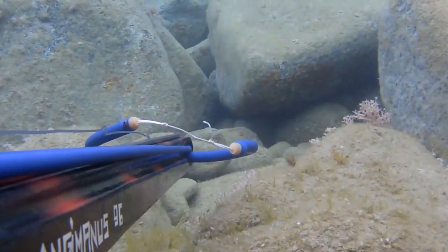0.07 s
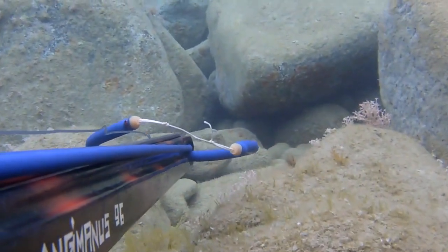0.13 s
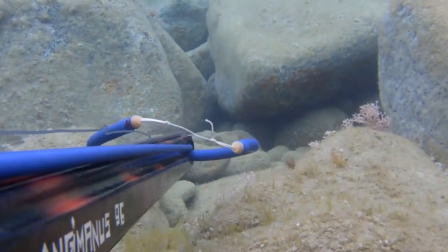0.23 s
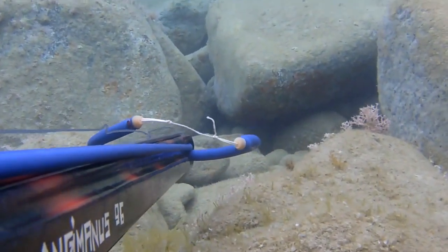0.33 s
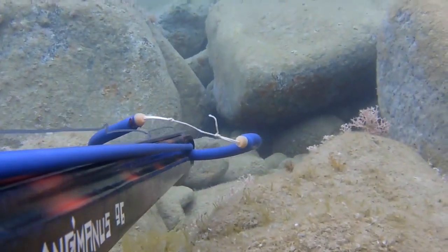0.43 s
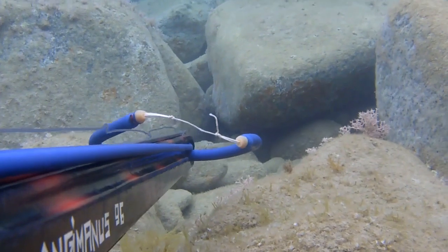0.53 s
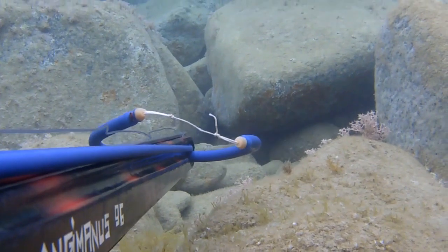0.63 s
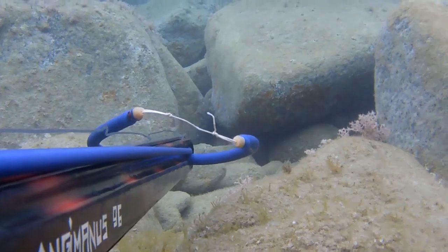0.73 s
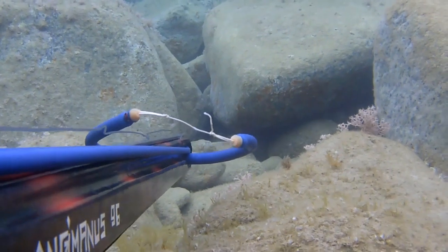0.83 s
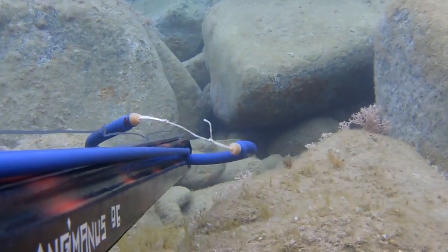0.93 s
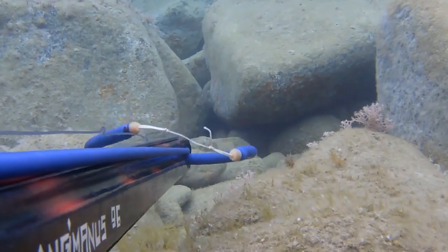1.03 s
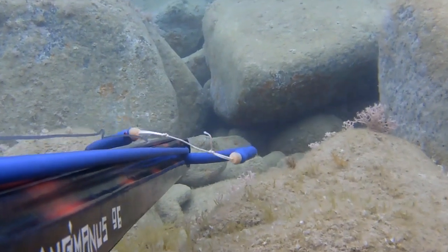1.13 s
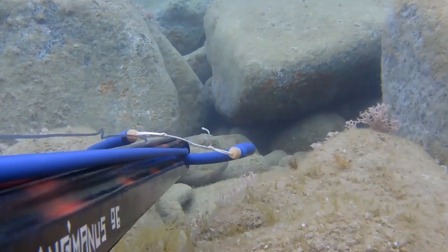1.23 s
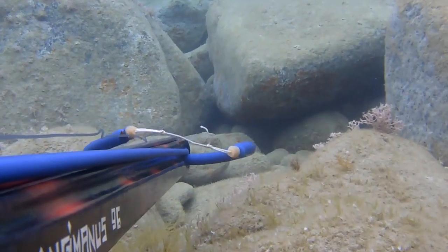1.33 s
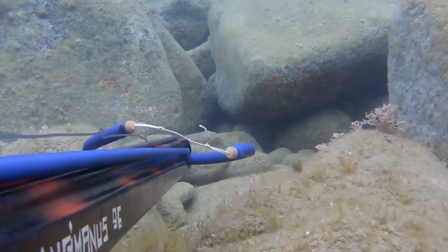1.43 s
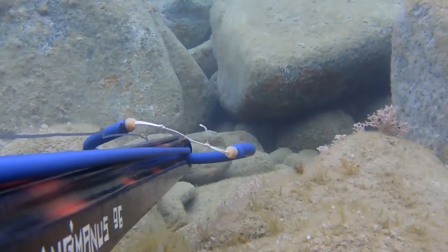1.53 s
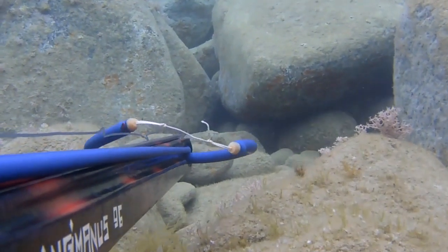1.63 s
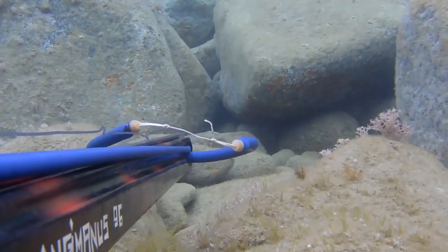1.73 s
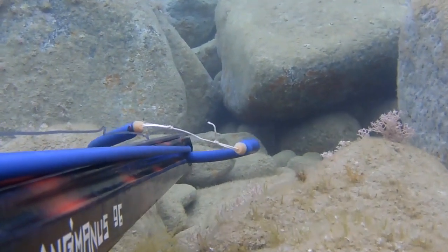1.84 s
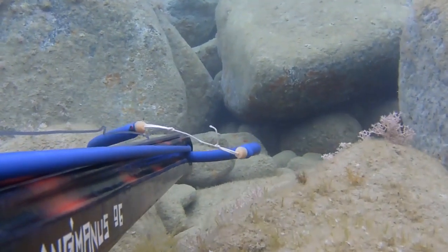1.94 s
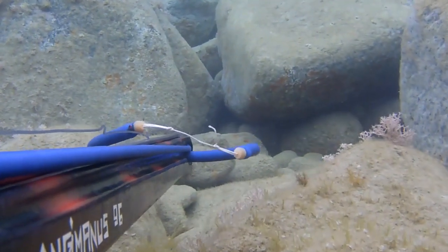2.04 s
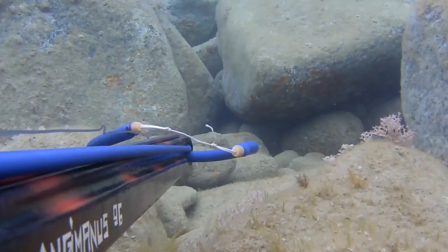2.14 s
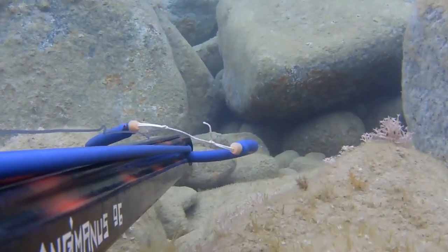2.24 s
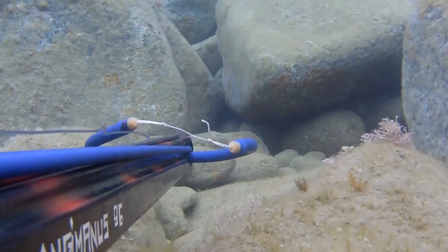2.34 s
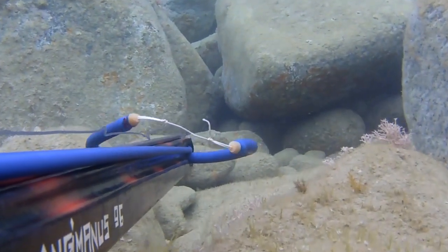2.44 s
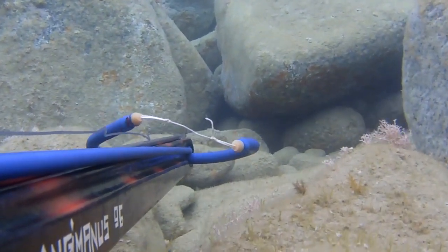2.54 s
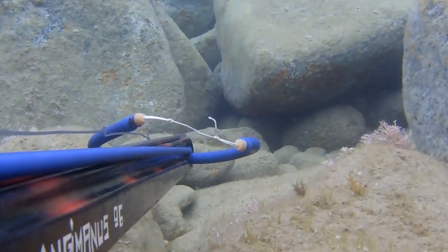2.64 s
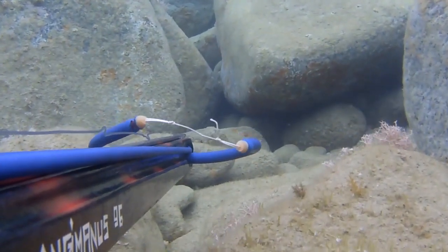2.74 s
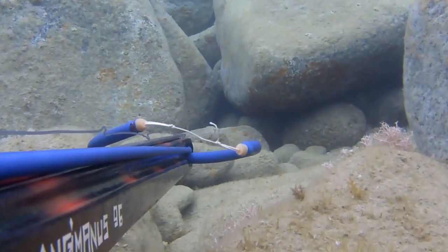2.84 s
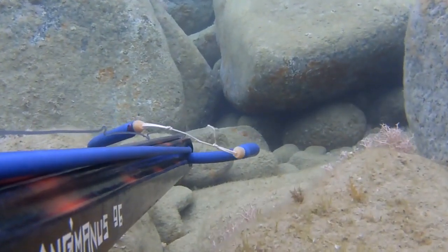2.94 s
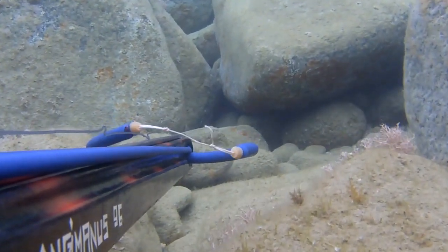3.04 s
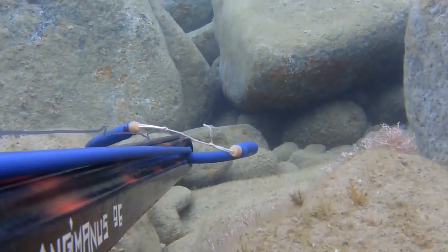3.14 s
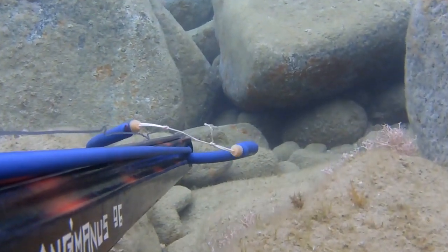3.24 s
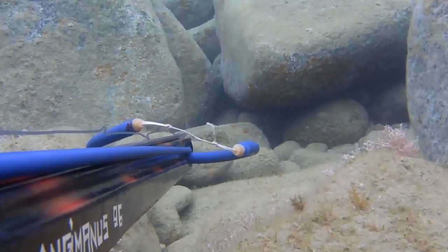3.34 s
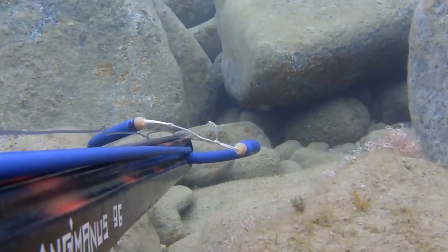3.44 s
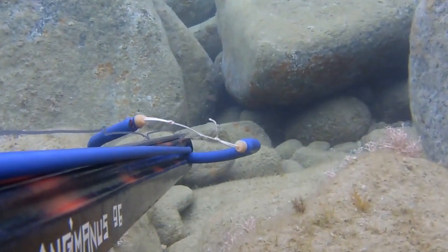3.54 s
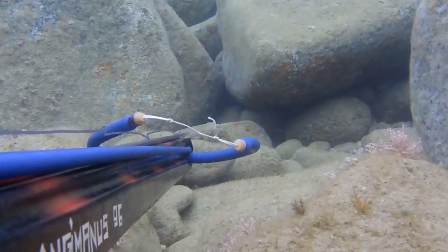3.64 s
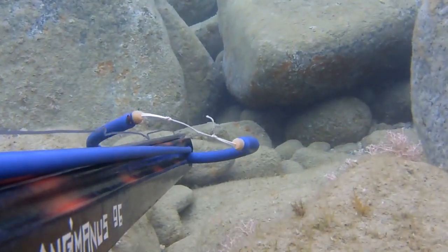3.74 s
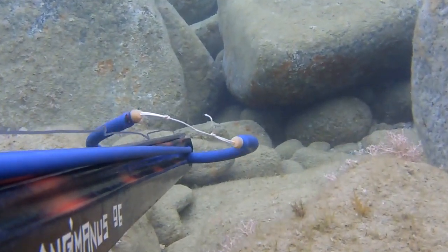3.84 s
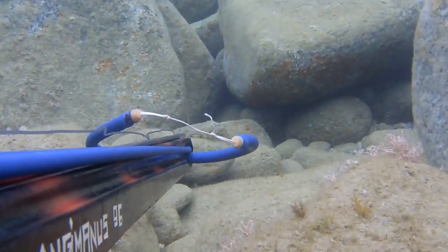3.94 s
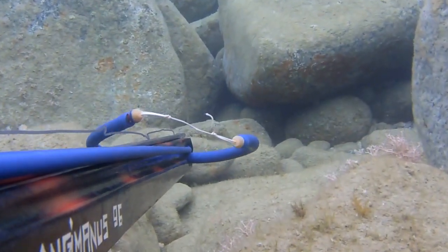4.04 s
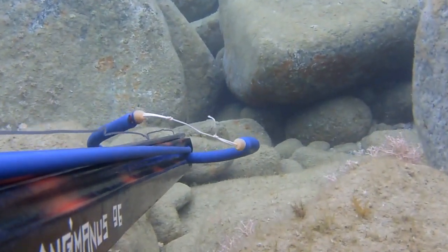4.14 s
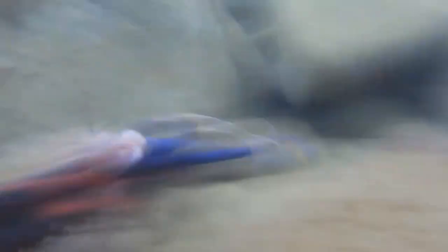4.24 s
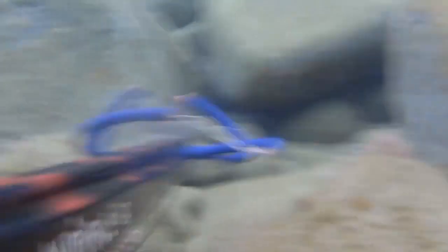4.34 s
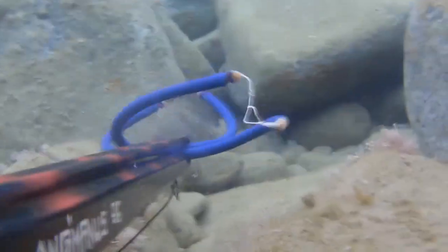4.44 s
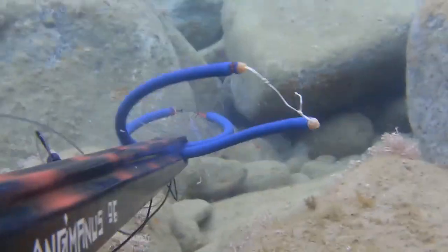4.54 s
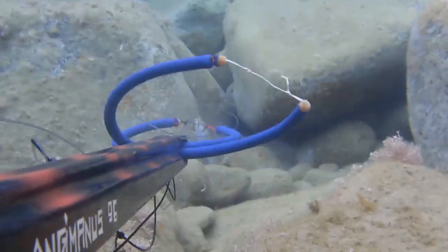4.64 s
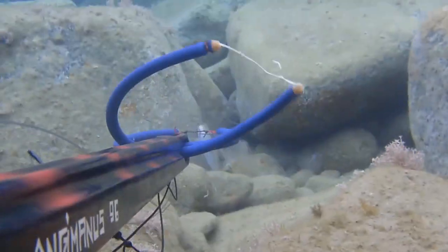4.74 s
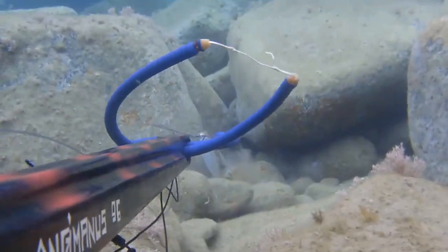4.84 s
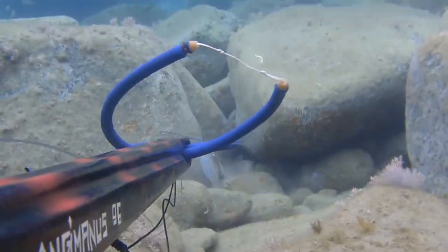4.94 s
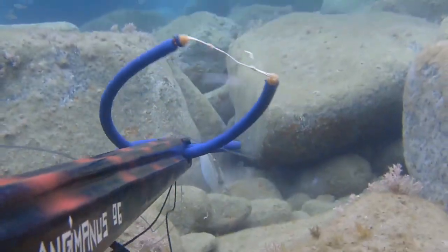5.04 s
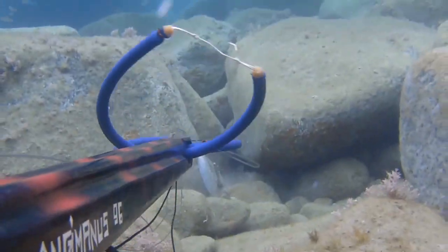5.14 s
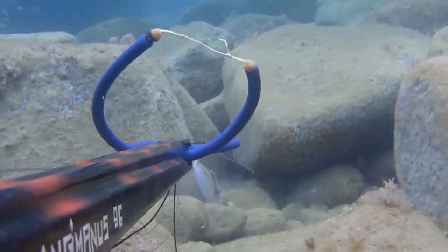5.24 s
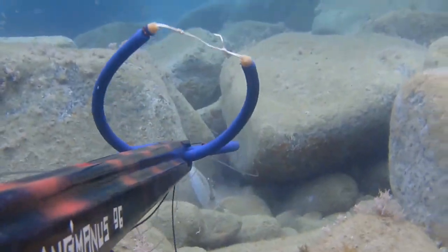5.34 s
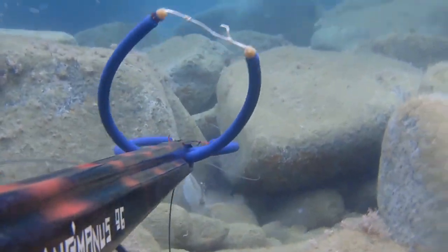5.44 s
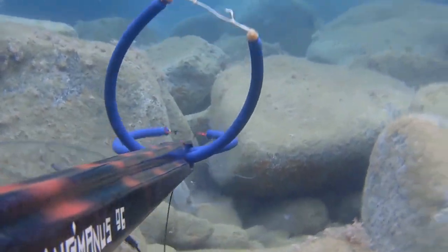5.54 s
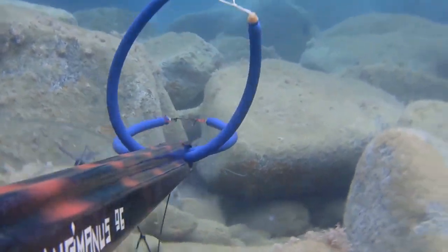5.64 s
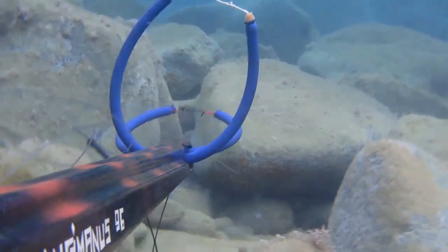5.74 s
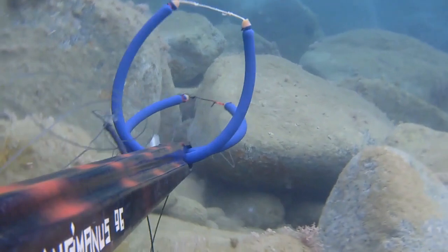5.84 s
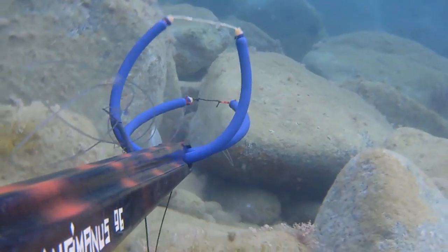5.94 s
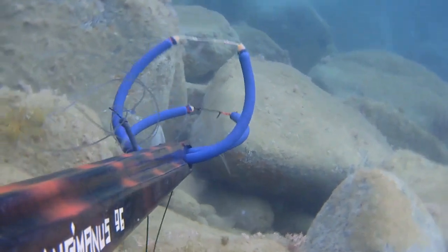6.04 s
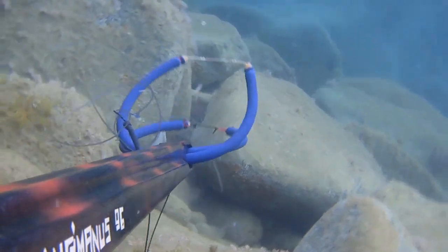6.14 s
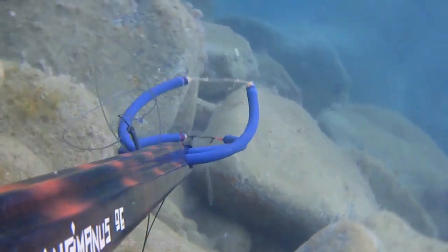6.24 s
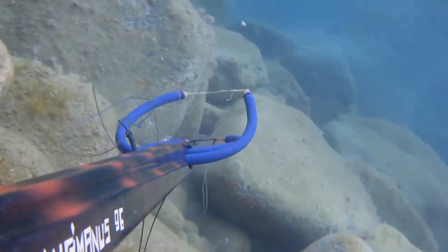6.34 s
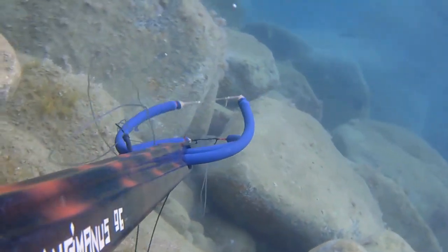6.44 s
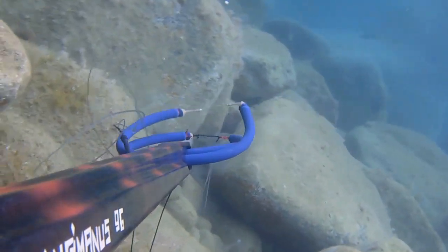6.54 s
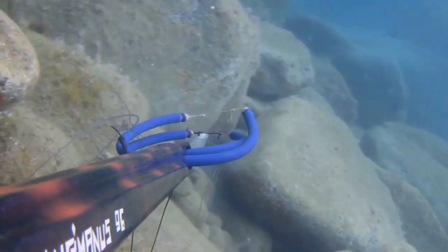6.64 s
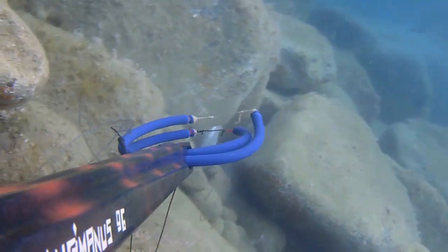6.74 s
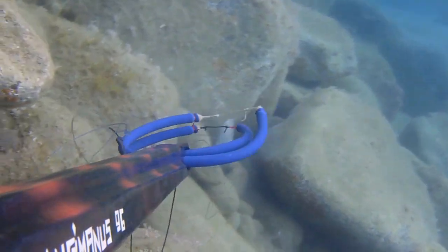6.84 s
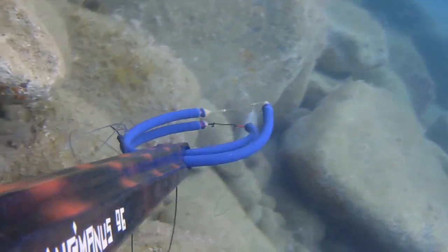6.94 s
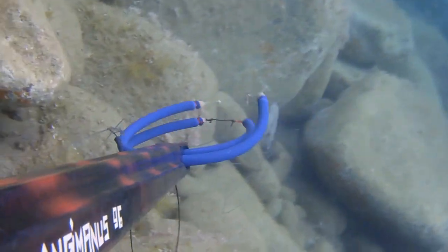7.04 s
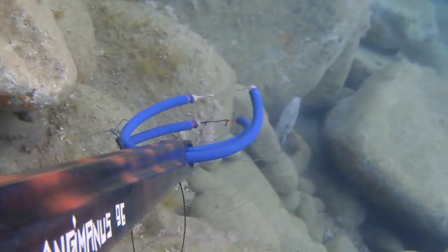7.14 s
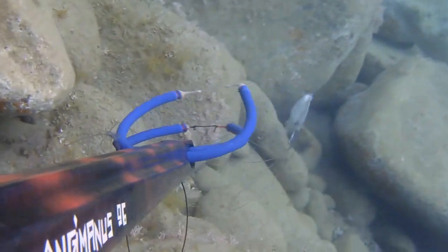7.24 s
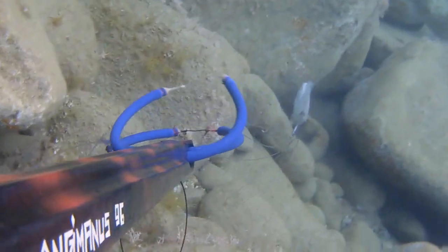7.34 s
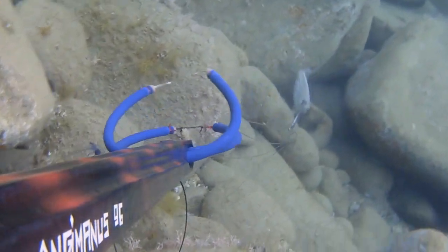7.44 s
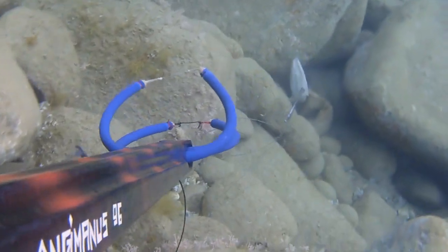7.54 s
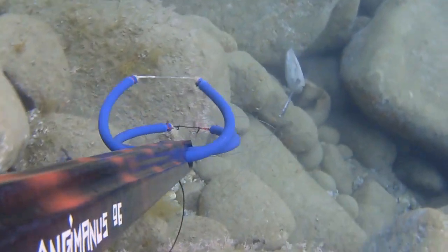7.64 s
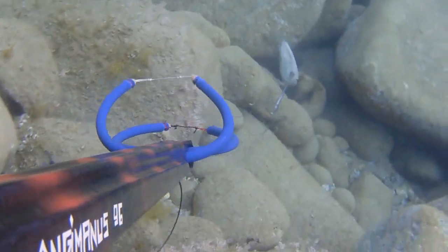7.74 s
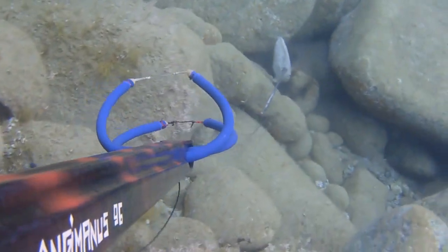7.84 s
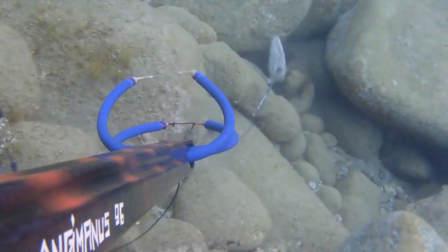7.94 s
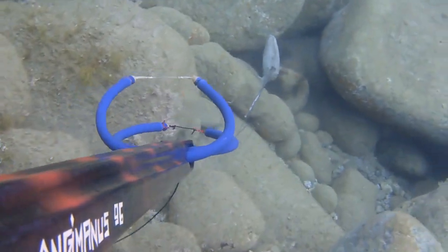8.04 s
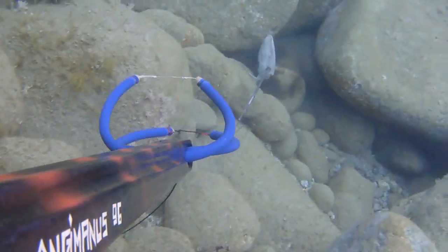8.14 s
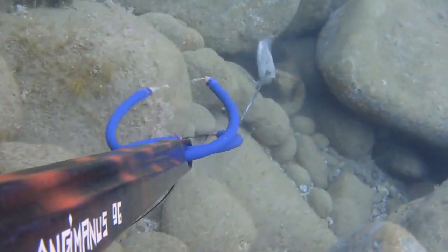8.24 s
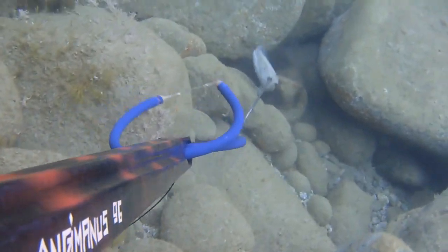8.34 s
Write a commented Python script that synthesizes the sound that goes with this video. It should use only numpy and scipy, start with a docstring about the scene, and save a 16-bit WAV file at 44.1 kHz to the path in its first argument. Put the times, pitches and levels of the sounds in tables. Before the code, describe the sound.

A close, boxy underwater perspective on a speargun. Four seconds of near quiet: low water wash, fine irregular snapping, faint resonant creaks of the grip. A sudden huge shot distorts the input, a jagged burst of metallic crack, slapping rubber and low recoil, ending in a few hard knocks and a rumble. Handling follows with woody squeaks, small clicks and a row of rasping strokes over stone, then a sharp knock near seven seconds and fading rubs.

```python
"""Speargun under water

Among rocks, a speargun with a camera fixed to it is aimed, fired and handled.
Hand, knocks and shot ring the damped modes of the gun; the shot overloads the input.
Shrimp snaps are shaped noise bursts and the spear scrapes are gritty noise strokes over stone,
both coloured by water and housing. Sea wash and microphone hiss lie behind.
"""
import sys
import numpy as np
from scipy import signal
from scipy.fft import rfft, irfft, next_fast_len
from scipy.io import wavfile
from scipy.ndimage import uniform_filter1d

SR = 44100
rng = np.random.default_rng(int(sys.argv[2]) if len(sys.argv) > 2 else 0)


def bounce(signal):
    """Save signal as a 16-bit WAV file at the path given by the first command-line argument."""
    frames = np.transpose(np.atleast_2d(signal))
    limited = np.clip(frames, -1, 1)
    pcm = np.round(limited * 32767).astype(np.int16)
    wavfile.write(sys.argv[1], SR, pcm)


N = 369999  # length in samples

# sea wash and microphone hiss: pitch_hz, relative level_db
SEA_SPECTRUM = [(12, -63.5), (20, 0.5), (285, -1.5), (446, -4), (624, -5.5), (897, -9.5), (2530, -20.5),
                (2990, -18.5), (3250, -23.5), (3840, -24.5), (5080, -27), (9140, -30.5), (16000, -34.5)]
SEA_DB = -52.5  # rms level

# shrimp snaps: start_s, relative level_db, treble_db (treble against bass, before a fixed lift)
SNAPS = [(0.015, -42, -17), (0.117, -34.5, -35), (0.2334, -49, -5), (0.5182, -36, -17), (0.563, -43, -11),
         (0.804, -36, -16), (0.848, -43.5, -14), (1.0074, -36.5, -15), (1.1783, -47, -8), (1.319, -42, -18),
         (1.486, -34.5, -13), (1.495, -38, -11), (1.5783, -37, -13), (1.609, -42.5, -13), (1.6731, -55, -4),
         (1.8858, -37, -44), (1.913, -39, -25), (2.0235, -36, -12), (2.426, -38.5, -4.5), (2.472, -47, -25),
         (2.624, -41, -34), (2.7117, -37, -15), (2.9419, -38.5, -40), (3.079, -44, -9),
         (3.3937, -46.5, -26), (3.4375, -43, -32), (3.502, -38.5, -19), (3.6553, -49, -6),
         (4.0846, -41, -14.5), (4.1133, -34, -24), (4.5976, -38.5, -13), (4.704, -45.5, -6),
         (4.7895, -43.5, -2), (4.8172, -26, -39), (4.8594, -36, -21), (4.958, -40.5, -16),
         (5.601, -33.5, -22), (5.7736, -38.5, -15), (5.824, -39, -32), (5.9495, -32, -28), (6.12, -43, -18),
         (6.1484, -38.5, -24), (6.1724, -42, -22), (6.302, -35.5, -38), (7.046, -40, -27),
         (7.167, -32, -10), (7.217, -39, -35), (7.8688, -35.5, -20), (8.072, -51, -8)]
# colour of snaps heard through water and housing: pitch_hz, relative level_db
THROUGH_WATER = [(710, -26.5), (1200, -13), (1760, 3), (2150, -15), (2850, 3.5), (3340, 0.5), (3760, -0.5),
                 (4690, -8), (5160, -15), (5610, -11), (7630, -14), (8300, -12), (10600, -12.5),
                 (12000, -35.5), (15000, -27.5)]
FAR_SNAPS_DB = -66.5  # rms of each band's crackle envelope
FAR_SNAPS_PER_S = 55  # in each band
SNAP_SPLIT_HZ = 5500

# modes of gun and camera mount: pitch_hz, level_db, t60_s
GUN_MODES = [(64.5, -9, 0.22), (125, -15, 0.063), (154.4, -4, 0.13), (228, -3, 0.11), (622.3, 0.5, 0.085),
             (736, -4.5, 0.018), (807, -4.5, 0.041), (1047, -10, 0.029), (1315, -15.5, 0.029),
             (1466, -2, 0.035), (1620, -7, 0.022), (1924, -4.5, 0.021), (3490, -1, 0.0069)]
LOW_HZ = 150  # pitch from which force tilts and knock octaves are counted

# the gun swings through the water and rocks its lowest mode: time_s, level_db
SWAY = [(4.45, -30), (4.7, -44), (4.85, -53.5), (5.2, -60), (5.3, -46), (5.45, -55.5), (5.6, -46),
        (6.1, -51), (6.85, -55.5), (7.1, -63), (8.39, -59.5)]
WOBBLE_DB = -3.5  # slow pressure wobble, relative to the rocking

# hand and line rub the gun: time_s, force_db (at LOW_HZ), tilt_db (per octave above it)
RUB = [(3.6, -65, -2), (3.92, -44, -10), (4.0, -61, -5.5), (4.25, -44.5, -3.5), (4.5, -30, -4),
       (4.66, -40, -2.5), (4.74, -54.5, -1.5), (4.92, -61.5, -0.5), (5.21, -45.5, -0.3), (5.31, -57, -2.5),
       (5.52, -44.5, -1), (5.7, -45.5, -2), (5.86, -44.5, -0.6), (6.07, -52, .1), (6.25, -43, 0.6),
       (6.45, -50.5, -1.5), (6.55, -47.5, -2.5), (6.75, -55, -3), (6.94, -57, -1.3), (7.06, -46, -3.5),
       (7.28, -44.5, -2.5), (7.65, -53, -0.7), (7.96, -61.5, 2), (8.08, -63, -5), (8.2, -55.5, -4),
       (8.39, -69, -5)]
# how well soft contact reaches the modes: pitch_hz, level_db
RUB_REACH = [(150, 0), (850, -6), (1450, 0.5), (1900, -14)]
# the grip mode hums with the tremor of the hand: time_s, level_db
HUM = [(0, -65), (.45, -63), (.55, -54.5), (.71, -66), (.95, -54), (1.2, -61.5), (1.34, -44.5),
       (1.45, -55.5), (1.85, -54.5), (2.03, -59.5), (2.15, -46), (2.26, -56), (2.4, -45.5), (2.5, -51.5),
       (2.95, -63.5), (3.05, -51.5), (3.3, -53), (3.5, -63), (3.6, -59), (4.05, -57.5), (4.2, -50),
       (4.55, -40), (4.7, -51.5), (4.92, -59), (5.2, -39), (5.33, -55.5), (5.5, -44.5), (5.72, -58),
       (5.86, -33), (6.06, -55), (6.24, -42.5), (6.45, -56.5), (6.75, -53), (6.94, -50), (7.2, -47),
       (7.7, -56.5), (8.08, -62.5), (8.2, -54.5), (8.39, -69)]
HUM_HZ = 623.5

# strokes of the spear over stone: start_s, length_s, level_db
SCRAPES = [(5.773, 0.12, -68), (6.115, 0.085, -61), (6.215, 0.1, -53), (6.33, 0.092, -57),
           (6.412, 0.097, -56.5), (6.495, 0.074, -58), (6.579, 0.127, -48), (6.716, 0.075, -48.5),
           (6.779, 0.063, -56), (6.847, 0.052, -53)]
# colour of stone friction through water and housing: pitch_hz, relative level_db
STONE = [(940, -39.5), (1600, -7.5), (2280, -7.5), (2440, -11), (2680, -1.5), (3480, -4.5), (4440, -15),
         (5160, -21), (6940, -26.5), (7480, -18), (8140, -32), (9010, -21.5), (12000, -34.5),
         (15600, -64.5), (22000, -120)]

# lone rings (a small bubble, trigger steel, a tap on the shaft, the mount rocking):
# start_s, level_db, pitch_hz, rise_s, t60_s
PINGS = [(.925, -44, 1600, .004, .06), (4.2648, 3, 5300, .0022, .02), (4.8165, -31, 2950, .001, .03),
         (6.987, -21, 113, .003, .07)]

# knocks on the gun: start_s, contact_ms, level_db, favoured_octaves (above LOW_HZ),
# fall_db (per octave away from the favoured pitch)
KNOCKS = [(.542, 2.6, -36.5, 2.05, 21), (2.171, 2.7, -35, 2, 19), (2.42, 2.7, -33.5, 1.6, 16),
          (4.424, 0.6, -11, 0.81, 2), (4.444, 4.2, -10, 2.6, 20), (4.471, 4.6, -16.5, 2.9, 16.5),
          (4.51, 3.8, -16.5, 2.5, 11.5), (4.561, 4, -35, 3.1, 16), (5.05, 2, -41, 1.6, 8.5),
          (5.42, 2, -39, 2.7, 6), (5.815, 2.2, -31, .8, 4), (4.8, 1.3, -38.5, 3, 10),
          (5.535, 1.3, -27, 2.72, 12), (6.029, 2, -32, 3.07, 11), (6.15, 1.7, -28, 2.47, 9),
          (6.297, 1, -24, 3.05, 16), (6.349, 2.3, -25.5, 3, 15), (6.482, 1.1, -26.5, 1.4, 4),
          (6.675, 7.1, -16, 2.6, 11.5), (6.9862, 0.76, -17.5, 3.04, 4.5), (7.109, 1.9, -31.5, 2.05, 25),
          (7.709, 3.1, -33.5, 1.83, 8.5)]
# how well knocks reach the modes: pitch_hz, level_db
KNOCK_REACH = [(150, 0), (620, 0), (800, -0.5), (1300, -2), (1900, 0.5), (3400, 0.5)]

# stages of the shot as spear and rubbers fly off:
# start_s, length_s, t60_s, shaking_db (at LOW_HZ), tilt_db (per octave above it)
SHOT = [(4.2675, 0.0056, .5, 8, 0.6), (4.2731, 0.017, .9, 13.5, -3.5), (4.293, 0.0057, 0.073, -24, -0.5),
        (4.298, 0.027, .55, 12, -3.5), (4.322, .058, 0.15, 15, -1.5), (4.375, 0.014, 0.18, -5.5, -5.5),
        (4.39, .024, 0.3, 4.5, -6), (4.413, 0.023, 0.089, -6, -5), (4.439, 0.088, 0.29, -14, -7.5)]
# how well the shot reaches the modes: pitch_hz, level_db
SHOT_REACH = [(66, 3.5), (150, -0.5), (230, -0.5), (620, 2.5), (1000, 2.5), (1450, 2.6), (3300, -4)]
# low thump of the recoil: pitch_hz, relative level_db
RECOIL = [(15, -15.0), (60, -8), (220, 2), (320, -5.5), (600, -21), (3000, -60)]
SLAPS_DB, SLAP_S = 2, 0.004  # uneven slaps of the rubbers on the barrel: depth, smoothing

OVERLOAD = 0.44  # input amplitude around which clipping sets in
EDGE_HZ = 15850  # top of the band


def gain_of(db):
    """Decibels to gain."""
    return 10 ** (np.asarray(db) / 20)


def evened(x):
    """Scales to rms 1."""
    return x / np.sqrt(np.mean(x ** 2) + 1e-20)


def coloured(x, points):
    """Filters by a spectrum given as pitch_hz, level_db."""
    f, db = np.transpose(points)
    size = next_fast_len(len(x))
    hz = np.fft.rfftfreq(size, 1 / SR)
    gain = gain_of(np.interp(np.log(hz + 1), np.log(f + 1), db))
    return irfft(rfft(x, size) * gain, size)[:len(x)]


def ring(force, hz, t60):
    """A damped mode: a unit click gives a dying sine of starting height 1."""
    pole = np.exp((2j * np.pi * hz - np.log(1000) / t60) / SR)
    return signal.lfilter([1], [1, -pole], force).imag


def along(rows):
    """Gain curve drawn in decibels through rows of time_s, level_db; near silence outside it."""
    s, db = np.transpose(rows)
    return gain_of(np.interp(np.arange(N) / SR, s, db, left=-200, right=-200))


def slow_noise(length, smooth_s):
    """Smoothed noise of rms 1, for uneven levels."""
    return evened(uniform_filter1d(rng.standard_normal(length), max(round(smooth_s * SR), 1)))


def grit(lumps_db, lump_s):
    """Friction force: noise that comes in uneven lumps."""
    lumps = slow_noise(N, lump_s)
    return evened(rng.standard_normal(N) * gain_of(lumps_db * lumps))


def reach(hz, points, tilt_db):
    """Level of a force at one mode: its spectrum, tilted per octave above LOW_HZ."""
    f, db = np.transpose(points)
    spectrum_db = np.interp(np.log(hz), np.log(f), db)
    return spectrum_db + tilt_db * np.log2(max(hz / LOW_HZ, 1))


def sea():
    """The wash of the sea and the hiss of the microphone: slightly lumpy coloured noise."""
    wash = grit(lumps_db=0.4, lump_s=0.05)
    return gain_of(SEA_DB) * evened(coloured(wash, SEA_SPECTRUM))


def snaps():
    """Each snap is a ragged burst with its scatter among the rocks; many far ones crackle behind."""
    t = np.arange(6000) / SR
    rise = np.minimum(1, t / 0.0015)
    # a quick burst and its longer scatter
    shape = (gain_of(-60 * t / 0.041) + 0.24 * gain_of(-60 * t / 0.11)) * rise
    # far snaps come dull or bright independently
    strength = gain_of(2.3 * np.minimum(rng.exponential(1, (2, N)), 3))
    far = strength * (rng.random((2, N)) < FAR_SNAPS_PER_S / SR)
    crackle = signal.oaconvolve(far, shape[None])[:, :N]
    dull, bright = gain_of(FAR_SNAPS_DB) * evened(crackle)
    for s, db, treble_db in SNAPS:
        start = round(s * SR)
        dull[start:start + len(t)] += 0.35 * shape * gain_of(db)
        bright[start:start + len(t)] += 0.36 * shape * gain_of(db + treble_db + 12)
    noise = evened(coloured(grit(lumps_db=3.0, lump_s=0.0019), THROUGH_WATER))
    low_pass = signal.butter(4, SNAP_SPLIT_HZ, fs=SR, output="sos")
    high_pass = signal.butter(4, SNAP_SPLIT_HZ, "high", fs=SR, output="sos")
    return dull * signal.sosfilt(low_pass, noise) + bright * signal.sosfilt(high_pass, noise)


def sway():
    """The lowest mode rocks in lumps over a slow wobble of pressure."""
    hz, t60 = 27, 0.4
    wobble = evened(ring(ring(rng.standard_normal(N), hz, t60), hz, t60))
    hz, _, t60 = GUN_MODES[0]
    force = grit(lumps_db=5.0, lump_s=0.018)
    rocking = evened(ring(ring(force, hz, 0.24 * t60), hz, 0.5 * t60))
    return along(SWAY) * (rocking + gain_of(WOBBLE_DB) * wobble)


def handling():
    """Lumpy friction noise shakes the middle modes; a double pass keeps the valleys dark."""
    s, force_db, tilt_db = np.transpose(RUB)
    out = np.zeros(N)
    # all modes share the same lumps
    lumps = gain_of(4.2 * slow_noise(N, 0.01))
    for hz, db, t60 in GUN_MODES[1:-1]:
        is_grip_mode = abs(hz / HUM_HZ - 1) < 0.06
        rubbed = list(zip(s, force_db + reach(hz, RUB_REACH, tilt_db) + db))
        level = along(HUM if is_grip_mode else rubbed)
        force = ring(rng.standard_normal(N), hz, 0.13 * t60) * lumps
        # set the level before the second pass, so the mode rings on after it drops
        out += ring(force * level, hz, t60) / np.std(ring(force, hz, t60))
    return out


def scrape():
    """Spear on stone: gritty friction noise in strokes with short ramps at both ends."""
    level = np.zeros(N)
    for s, length, db in SCRAPES:
        level[round(s * SR):round((s + length) * SR)] += gain_of(db)
    ramped = uniform_filter1d(level, round(0.0099 * SR))
    return ramped * evened(coloured(grit(lumps_db=2.5, lump_s=0.0026), STONE))


def pings():
    """Lone rings: single sines that rise briefly and die away."""
    out, t = np.zeros(N), np.arange(SR // 4) / SR
    for s, db, hz, rise, t60 in PINGS:
        swell = np.minimum(1, (t / rise) ** 2)
        ping = np.sin(2 * np.pi * hz * t) * swell * gain_of(db - 60 * t / t60)
        out[round(s * SR):][:len(t)] += ping
    return out


def knocks():
    """Each mode swells while the contact lasts, then dies at its own speed; noise adds a crack."""
    out, t = np.zeros(N), np.arange(SR // 4) / SR
    for s, contact_ms, knock_db, octave, fall_db in KNOCKS:
        part = out[round(s * SR):][:len(t)]
        for hz, db, t60 in GUN_MODES:
            rise = contact_ms / 1000 + 0.079 / hz
            swell = np.sin(np.pi / 2 * np.minimum(1, t / rise)) ** 2
            off_pitch_db = fall_db * abs(np.log2(hz / LOW_HZ) - octave)
            decay_db = 60 * np.maximum(t - rise, 0) / t60
            level_db = db + knock_db + reach(hz, KNOCK_REACH, 0) - off_pitch_db - decay_db
            phase = 2 * np.pi * rng.random()
            part += gain_of(level_db) * swell * np.sin(2 * np.pi * hz * t + phase)
        # the crack counts as 4.4 octaves above LOW_HZ, so bright knocks crack most
        noise = rng.standard_normal(len(t))
        crack = evened(coloured(noise, [(1000, -14), (2500, -3.5), (6000, -13), (15000, -26)]))
        crack_db = knock_db - fall_db * abs(4.4 - octave) - 2.5 - 60 * t / 0.012
        part += crack * gain_of(crack_db) * np.minimum(1, t * 1000 / contact_ms)
    return out


def shot():
    """Violent shaking in stages; rubber and hand damp the modes, so they ring broad."""
    out = np.zeros(N)
    shaking = []
    for hz, _, t60 in GUN_MODES:
        force = grit(lumps_db=6.5, lump_s=0.012)[:SR]
        shaking.append(evened(ring(ring(force, hz, 0.18 * t60), hz, 0.51 * t60)))
    # rattling parts hiss along with the top mode, the recoil thumps with the lowest
    shaking[-1] += 0.5 * evened(coloured(rng.standard_normal(SR), STONE))
    shaking[0] += 1.5 * evened(coloured(rng.standard_normal(SR), RECOIL))
    slaps = gain_of(SLAPS_DB * slow_noise(SR, SLAP_S))
    first = round(SHOT[0][0] * SR)
    for s, length, t60, force_db, tilt_db in SHOT:
        t = np.arange(0, length, 1 / SR)
        start = round(s * SR)
        # read the shaking from a quarter second in, once the modes have built up
        used = start - first + SR // 4 + np.arange(len(t))
        part = np.zeros(len(t))
        for (hz, db, _), mode in zip(GUN_MODES, shaking):
            part += gain_of(db + force_db + reach(hz, SHOT_REACH, tilt_db)) * mode[used]
        edges = np.minimum(1, np.minimum(t, length - t) / 0.00033)
        out[start:start + len(t)] += part * slaps[used] * gain_of(-60 * t / t60) * edges
    return out


def scene():
    """All sources at one microphone."""
    background = sea() + snaps()
    gun = sway() + handling() + scrape() + pings() + knocks() + shot()
    return (background + gun)[None]


def record(dry):
    """The input stage clips with a firm knee; then a low-pass limits the band."""
    clipped = dry / (1 + abs(dry / OVERLOAD) ** 6.28) ** (1 / 6.43)
    low_pass = signal.firwin(511, EDGE_HZ, window=("kaiser", 9), fs=SR)
    return signal.oaconvolve(clipped, low_pass[None], "same")


dry = scene()
out = record(dry)
bounce(out)
```